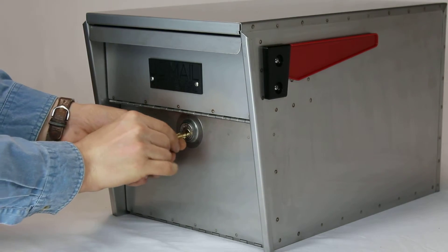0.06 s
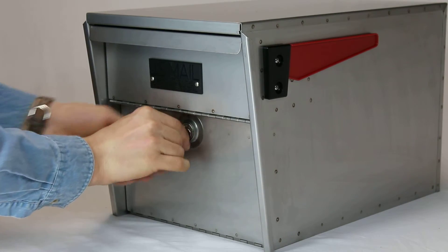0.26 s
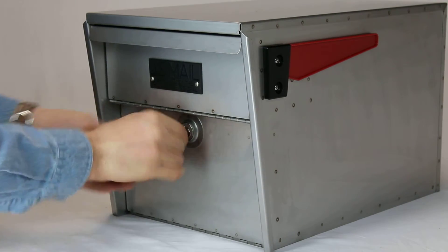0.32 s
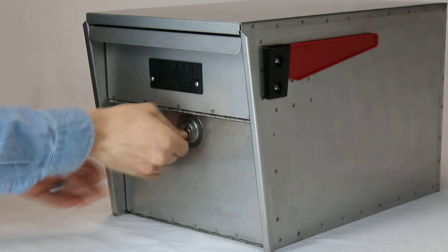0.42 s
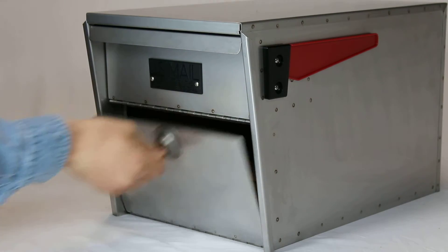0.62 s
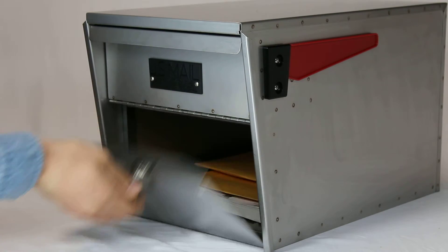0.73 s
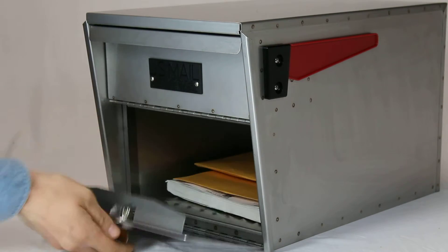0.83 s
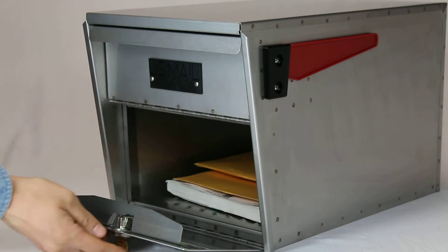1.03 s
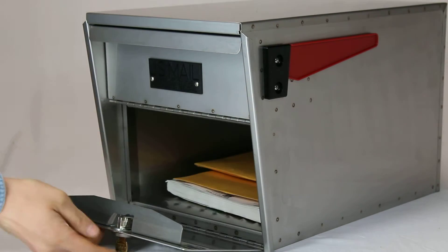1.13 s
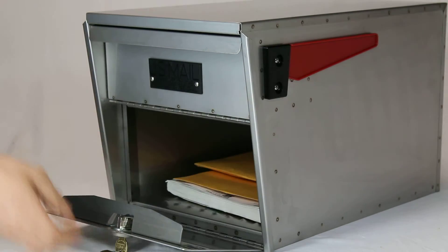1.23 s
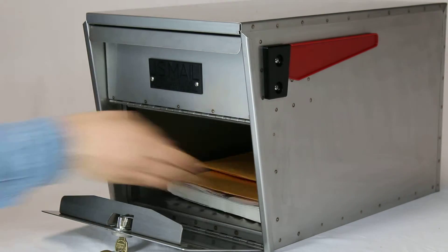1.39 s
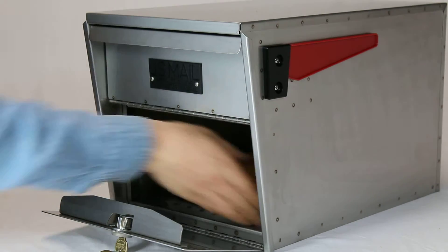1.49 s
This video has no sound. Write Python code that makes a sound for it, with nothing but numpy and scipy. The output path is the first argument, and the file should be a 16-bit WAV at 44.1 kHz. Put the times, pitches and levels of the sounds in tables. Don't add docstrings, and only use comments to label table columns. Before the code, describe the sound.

A key pushes into a metal mailbox lock, clicks, and the door drops open with clunks.

```python
import sys
import numpy as np
from scipy import signal
from scipy.fft import rfft, irfft
from scipy.io import wavfile
from scipy.ndimage import uniform_filter1d

SR = 44100
rng = np.random.default_rng(int(sys.argv[2]) if len(sys.argv) > 2 else 0)


def materialize(psi):
    bounded = np.clip(np.atleast_2d(psi).T, -1, 1)
    quanta = np.round(bounded * 32767).astype(np.int16)
    wavfile.write(sys.argv[1], SR, quanta)


def volts_from_decibels(level):
    exponent = np.asarray(level, float) / 20
    return 10 ** exponent


N = 68355
T = np.arange(N) / SR
BAND_EDGE = 3


def unit(x):
    return x / np.sqrt(np.mean(x ** 2))


def gain_curve(rows):
    return volts_from_decibels(np.interp(T, *np.array(rows).T))


def resonance(x, hz, width_hz):
    return signal.lfilter(*signal.iirpeak(hz, hz / width_hz, fs=SR), x)


def wobble(rate_hz):
    k = int(SR / rate_hz)
    return unit(uniform_filter1d(uniform_filter1d(rng.standard_normal(N), k), k))


def decay(t, t60):
    return np.exp(-np.log(1000) * t / t60)


def add(out, start_s, x):
    i = max(int(start_s * SR), 0)
    out[i:i + len(x)] += x[:N - i]


def ring(hz, level_db, rise_s, t60):
    t = T[:int(min(1.3 * t60 + 4 * rise_s, 1.5) * SR)]
    shape = (1 - np.exp(-t / rise_s)) ** 2 * decay(t, t60)
    return volts_from_decibels(level_db) * shape / shape.max() * np.sin(2 * np.pi * hz * t)


# (pitch_hz, density_db per Hz)
AIR_SPECTRUM = [(25, -22), (45, -23), (63, -12), (100, 2), (190, -17), (400, -9.5), (1500, -18.5),
                (8500, -40)]


def room_air():
    out = 0
    points_hz, points_db = np.array(AIR_SPECTRUM).T
    for hz in 21 * 2 ** np.arange(0, 9.6, .5):
        flicker_db = 0.8 * wobble(27)
        level_db = np.interp(np.log(hz), np.log(points_hz), points_db) + flicker_db
        noise = rng.standard_normal(N)
        out = out + volts_from_decibels(level_db) * resonance(resonance(noise, hz, hz / 2), hz, hz / 2)
    return volts_from_decibels(-48) * unit(out)


# (pitch_hz, level_db, wobble_db)
HUM_TONES = [
    (45.5, -47, 1.2),
    (91, -42, 1.0),
    (138, -54, 1.5),
    (184, -60, 1.5),
]


def hum():
    out = 0
    for hz, level_db, wobble_db in HUM_TONES:
        out = out + volts_from_decibels(level_db + 1 + wobble_db * wobble(25)) * np.sin(2 * np.pi * hz * T)
    return out


# (start_s, level_db)
SLEEVE_LEVEL = [
    (.52, -63),
    (.62, -59),
    (.74, -55),
    (1.36, -60),
    (1.45, -59),
    (1.55, -49.5),
]


def sleeve():
    hiss = unit(resonance(rng.standard_normal(N), 4360, 5700))
    return hiss * volts_from_decibels(1.2 * wobble(51)) * gain_curve(SLEEVE_LEVEL)


def room(x):
    low_t60, high_t60, gap_s = 0.33, 0.11, 0.0047
    t, noise = T[:SR // 2], rng.standard_normal(SR // 2)
    low = signal.lfilter(*signal.butter(1, 2500, fs=SR), noise)
    low_tail = low * decay(t, low_t60)
    tail = low_tail + 0.82 * (noise - low) * decay(t, high_t60)
    tail = signal.lfilter(*signal.butter(2, 180, "high", fs=SR), tail * (t > gap_s))
    tail = tail / np.sqrt(np.sum(low_tail ** 2))
    return volts_from_decibels(-9.5) * signal.fftconvolve(x, tail)[:N]


# (pitch_hz, t60_s)
KEY_MODES = [(7960, .07), (8366, .11), (9490, .28), (11675, .11), (14705, .2)]
# (start_s, level_db of the 8 kHz pair, of 9.5 kHz, of 11.7 kHz, of 14.7 kHz)
KEY_JINGLES = [(.797, -53, -56, -66, -64), (.806, -45, -68, -50, -58), (.838, -57, -59, -68, -60),
               (.858, -64, -61, -62, -68), (.907, -62, -60, -72, -72), (.921, -50, -70, -72, -72),
               (1.0126, -62, -62, -51, -48), (1.03, -62, -70, -60, -56), (1.055, -58, -70, -72, -62),
               (1.2395, -47, -72, -72, -70), (1.2515, -45, -72, -72, -66)]


def key():
    out = np.zeros((len(KEY_MODES), N))
    for start_s, pair_db, *rest_db in KEY_JINGLES:
        levels_db = [pair_db - 6, pair_db, *rest_db]
        for line, (hz, t60), level_db in zip(out, KEY_MODES, levels_db):
            add(line, start_s, ring(hz, level_db, rise_s=.003, t60=t60))
    return sum(line * volts_from_decibels(2.5 * wobble(90)) for line in out)


# (start_s, effort_db)
DRAG_EFFORT = [(.017, -70), (.024, -38), (.1, -37), (.17, -36), (.22, -29), (.25, -22), (.29, -30),
               (.36, -36), (.45, -37), (.5, -35), (.62, -41), (.85, -45), (.89, -36), (.97, -42),
               (1.1, -40), (1.2, -50), (1.26, -46), (1.36, -60)]
# (pitch_hz, width_hz, level_db)
BOX_WALLS = [(164, 38, -10.5), (266.4, 74, 1), (329, 64, -7), (359, 29, -5), (424.3, 34, -0.5),
             (531.3, 50.5, -4.5), (622, 51, -4.5), (754, 47, -5), (827, 24, -14.5), (996, 131, -5.5),
             (1160, 59, -17), (1328, 99, -12), (1977, 410, -13), (2530, 1260, -14.5)]
# (start_s, level_db)
PIN_RATTLE = [
    (.017, -65),
    (.024, -40),
    (.07, -58),
    (.16, -51),
    (.2, -40.5),
    (.245, -31),
    (.28, -53),
    (.34, -67),
]


def drag():
    ticks_per_s, spread_db = 5000, 3
    size = volts_from_decibels(spread_db * np.minimum(rng.exponential(size=N), 3))
    ticks = (rng.random(N) < ticks_per_s / SR) * size * rng.choice([-1, 1], N)
    effort = gain_curve(DRAG_EFFORT)
    push = ticks * effort
    body = 0
    for hz, width_hz, level_db in BOX_WALLS:
        wall = resonance(resonance(push, hz, width_hz), hz, 4 * width_hz)
        body = body + volts_from_decibels(level_db) * np.sqrt(1 / width_hz) * wall
    grit = unit(resonance(ticks, 4500, 6600)) * gain_curve(PIN_RATTLE)
    return unit(body) * np.sqrt(np.mean(effort ** 2)) + grit


# (start_s, level_db, pitch_hz, rise_s, t60_s)
PANEL_RINGS = [(0.018, -32.5, 810, 0.0016, 0.072), (0.0211, -24, 120, 0.015, 0.28),
               (0.0228, -22, 401, 0.002, 0.035), (0.226, -17.5, 150.4, 0.012, 0.15),
               (.215, -22, 455, 0.013, 0.094), (.268, -17.5, 440, .012, 0.064),
               (.24, -19, 307, 0.0076, 0.058), (.255, -24.5, 755, 0.0079, 0.096),
               (.225, -32.5, 1030, 0.0068, .08), (.245, -9, 120, 0.056, 0.17),
               (.272, -19, 318, 0.0094, 0.083), (0.338, -36, 270, 0.021, 0.81),
               (.36, -35, 358.3, 0.013, 0.7), (.37, -38, 745, 0.0077, 0.92),
               (0.469, -29, 114.8, 0.042, 0.1), (.47, -29.5, 830, 0.0039, .12),
               (.4672, -25.5, 3000, 0.00046, .014), (.28, -26, 180, .01, 0.097),
               (.42, -37, 365, 0.011, .12), (.5, -33.5, 357, 0.011, 0.19), (.579, -36, 360, .01, 1.1),
               (.842, -38, 760, .004, .07), (.8685, -19, 364, .004, .07), (.87, -30, 105, .01, .1),
               (.875, -36, 585, .004, .1), (.9, -32, 34, .02, .15), (.91, -24, 112, .03, .18),
               (1.012, -20, 401, 0.0011, 0.045), (1.009, -26.5, 1000, 0.0011, 0.11),
               (1.0087, -26.5, 1100, 0.0013, 0.081), (1.081, -32.5, 40, .02, 0.1),
               (1.083, -27.5, 235, 0.005, 0.12), (1.009, -25, 1297, .001, 0.072),
               (1.01, -30.5, 581, 0.003, 0.15), (1.237, -33.5, 425, 0.0013, 0.084),
               (1.237, -34.5, 1098, 0.0007, 0.063), (1.237, -37.5, 1900, 0.00083, 0.089),
               (1.245, -44.5, 2880, 0.0052, .12), (.878, -29, 440, 0.007, 0.12)]


def panels():
    out = np.zeros(N)
    for start_s, level_db, hz, rise_s, t60 in PANEL_RINGS:
        x = ring(hz, level_db, rise_s, t60)
        if t60 > .2 and hz > 200:
            x = x * volts_from_decibels(2.5 * wobble(40)[:len(x)])
        add(out, start_s, x)
    return out


# (start_s, level_db, pitch_hz, width_octaves, t60_s)
METAL_KNOCKS = [(.019, -26.5, 323.4, 0.77, 0.32), (0.024, -26.5, 2300, 1.07, 0.12),
                (.197, -25, 399.6, 0.54, 0.47), (.222, -22.5, 1091, 0.91, 0.27),
                (.248, -17, 1297, 1.3, 0.21), (0.261, -18, 1498, 0.88, 0.099),
                (.272, -19.5, 443.3, 0.99, 0.59), (.467, -26, 1101, 1.08, 0.3),
                (0.476, -31.5, 1902, 0.5, 0.16), (.68, -45, 897, 1.04, 0.084),
                (.882, -24, 2207, 1.06, 0.13), (.922, -26.5, 515.6, 1.35, 0.081),
                (1.0092, -21.5, 1251, 1.0, 0.21), (1.083, -26, 1595, 1.42, 0.16),
                (1.236, -23.5, 1198, 1.1, 0.11), (.87, -25.5, 418.5, 0.82, 0.16),
                (.5, -30, 702, 0.78, 0.16), (.09, -29.5, 278.6, 0.63, 0.22),
                (.175, -36.5, 2600, 0.55, 0.22), (.2, -29.5, 2390, .7, 0.22), (.235, -20.5, 2410, .6, 0.14),
                (.49, -32.5, 2804, .4, 0.17), (.845, -40, 1510, 0.6, 0.17), (1.03, -32, 171.4, 0.53, 0.58),
                (1.04, -31.5, 1000, .9, 0.25), (1.255, -34.5, 1698, .7, .16), (.7, -41.5, 139.5, .25, 0.32),
                (.17, -33, 135, .3, .15)]


def knocks(count, damping):
    out, chance = np.zeros(N), rng.random((len(METAL_KNOCKS), 3, count))
    for (start_s, level_db, hz, octaves, t60), (scatter, strength, phase) in zip(METAL_KNOCKS, chance):
        place = 2 * (np.arange(count) + scatter) / count - 1
        mode_hz = np.minimum(hz * 2 ** (1.7 * octaves * place), SR / 2.5)[:, None]
        t = T[:int(1.3 * t60 * SR)]
        fade = decay(t, t60 / (mode_hz / hz) ** damping)
        weight = np.exp(-3.2 * np.abs(place) ** BAND_EDGE) * (0.72 + strength)
        modes = np.sin(2 * np.pi * (mode_hz * t + phase[:, None]))
        x = (weight[:, None] * fade * modes).sum(axis=0)
        x *= 1 - np.exp(-t * hz / 2)
        add(out, start_s, volts_from_decibels(level_db) * x / np.abs(x).max())
    return out


# (start_s, level_db, pitch_hz, width_octaves, t60_s)
LOCK_CLICKS = [(0.0203, -17, 6340, 1.6, 0.012), (0.0772, -21, 10000, 1.4, 0.009),
               (0.109, -20, 8800, 1, 0.008), (0.1100, -22, 3150, 0.71, 0.011),
               (.1200, -23.5, 7800, 0.52, 0.02), (0.175, -28, 9300, 1.3, 0.045),
               (.186, -26, 9900, 1.3, 0.024), (0.1915, -21, 9500, 1.6, 0.016),
               (.208, -22, 11000, 0.98, 0.018), (.2205, -22, 6200, 0.57, 0.036),
               (0.237, -20, 7500, 0.87, 0.023), (0.2475, -11.5, 8200, 1.6, 0.0072),
               (0.4670, -17, 3340, 0.66, 0.016), (0.4672, -22.5, 7700, 1.3, 0.023),
               (.681, -37.5, 2700, 1.2, 0.042), (0.7964, -38, 3900, 0.74, 0.031),
               (0.837, -32, 9900, 4.9, .012), (0.874, -31, 8600, 0.85, .012),
               (0.8807, -22.5, 5320, 1.33, 0.025), (0.907, -28, 10300, 1.1, 0.017),
               (.9635, -34, 6460, 1.1, 0.009), (1.013, -35, 9000, 1.3, 0.011),
               (1.0782, -28.5, 5400, 1.7, 0.037), (1.2401, -34.5, 6000, 2, 0.014),
               (.019, -24, 3020, 1.3, .04), (.0655, -43, 10500, .6, .01), (.1222, -26.5, 3030, .5, 0.011),
               (0.1222, -23, 8660, 0.46, .01), (.1995, -29, 11500, .6, .01), (.2235, -22, 2300, 1.3, 0.037),
               (0.228, -27, 9500, 1., 0.0095), (.2462, -12.5, 2730, 0.89, 0.018),
               (0.2523, -10.5, 1920, 1.05, 0.015), (0.2589, -22, 6050, 1.1, 0.014),
               (.2645, -15.5, 2500, 0.69, .015), (.479, -25.5, 3060, 0.5, 0.037),
               (0.8721, -28, 4500, 1.9, 0.024), (0.906, -30, 9000, 0.22, .012),
               (1.0093, -18, 1400, 1.4, 0.022), (1.085, -32.5, 2760, .8, 0.033)]


def clicks():
    out, size = np.zeros(N), 4096
    f, t = np.arange(size // 2 + 1) * SR / size + 1, T[:size]
    noises = rng.standard_normal((len(LOCK_CLICKS), size))
    for (start_s, level_db, hz, octaves, t60), noise in zip(LOCK_CLICKS, noises):
        colour = np.exp(-.5 * np.abs(np.log2(f / hz) / (octaves / 2)) ** BAND_EDGE)
        crack = 1.27 * np.exp(-t / 0.00056)
        shiver = 0.22 * decay(t, 7.6 * t60)
        x = irfft(rfft(noise) * colour) * (crack + decay(t, t60) + shiver)
        onset = 1 - np.exp(-t * hz)
        add(out, start_s, volts_from_decibels(level_db) * x * onset / np.abs(x).max())
    return out


def scene():
    box = clicks() + knocks(count=80, damping=0.29) + drag()
    background = room_air() + hum() + sleeve()
    return (box + room(box) + panels() + key() + background)[None]


def roll_off(x):
    return signal.sosfilt(signal.butter(12, 15830, fs=SR, output="sos"), x)


def record(dry):
    dull = signal.sosfilt(signal.butter(3, 10530, fs=SR, output="sos"), dry)
    mix = signal.sosfilt(signal.ellip(8, .2, 60, 15500, fs=SR, output="sos"), dull)
    return roll_off(mix)


dry = scene()
out = record(dry)
materialize(out)
```